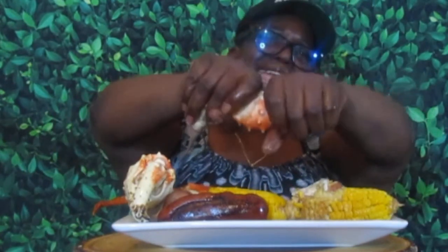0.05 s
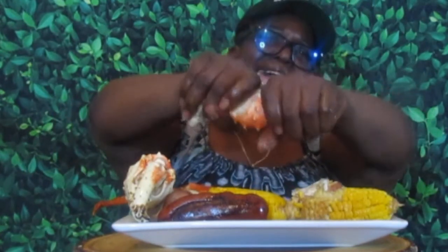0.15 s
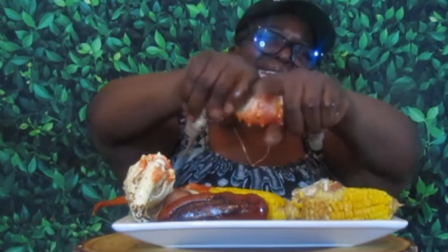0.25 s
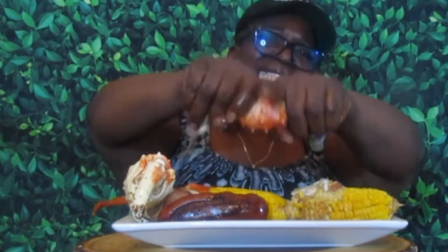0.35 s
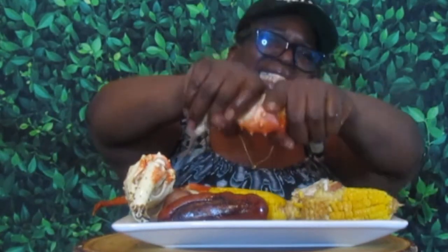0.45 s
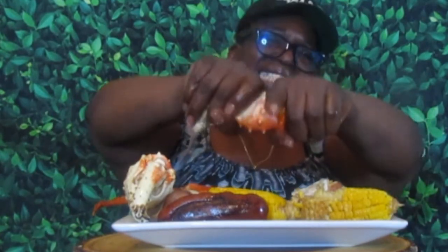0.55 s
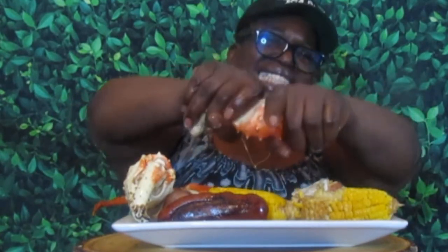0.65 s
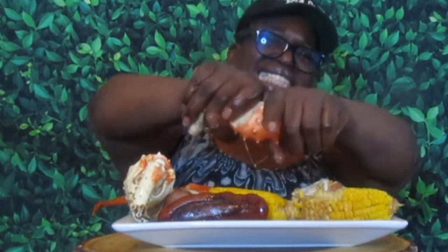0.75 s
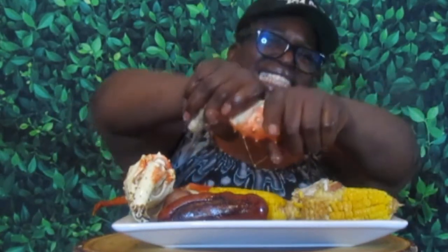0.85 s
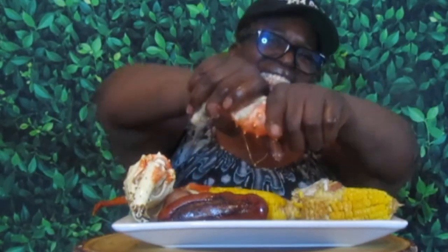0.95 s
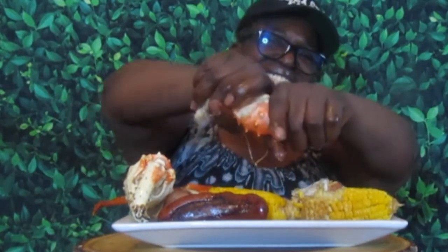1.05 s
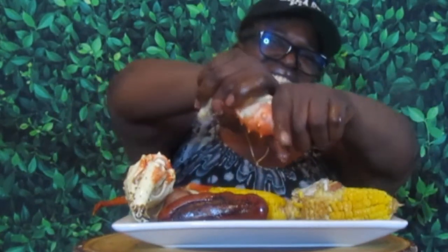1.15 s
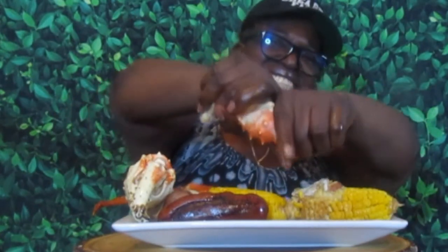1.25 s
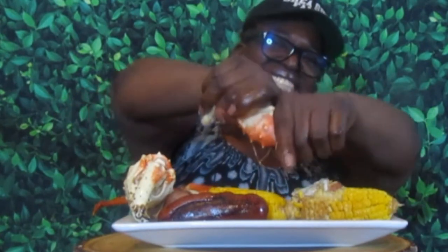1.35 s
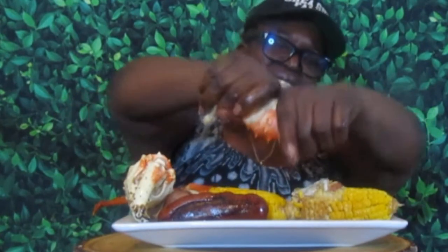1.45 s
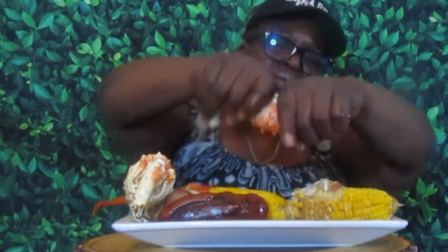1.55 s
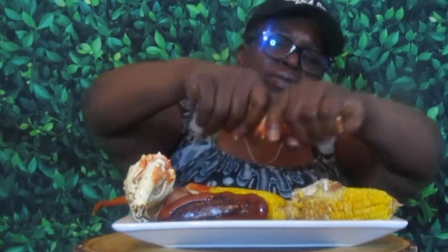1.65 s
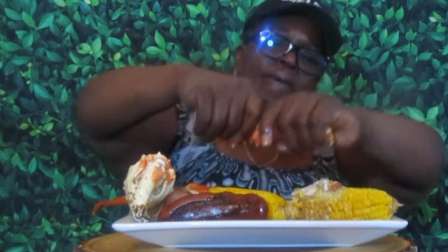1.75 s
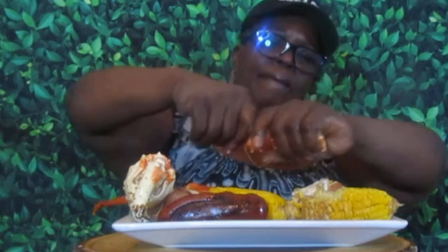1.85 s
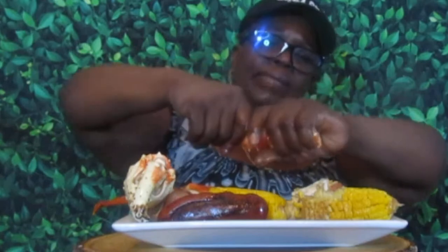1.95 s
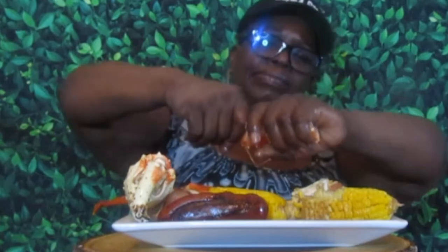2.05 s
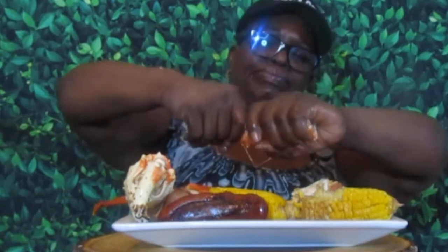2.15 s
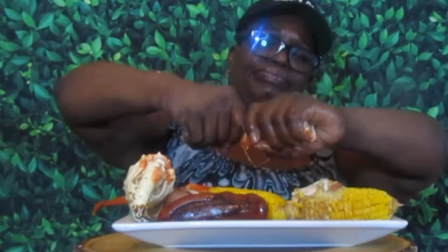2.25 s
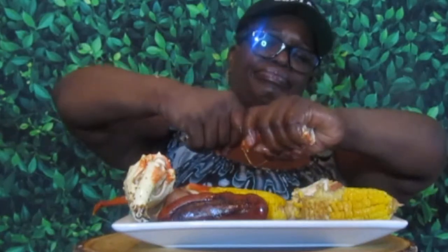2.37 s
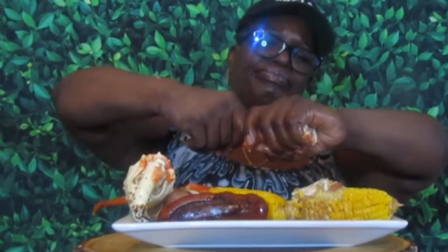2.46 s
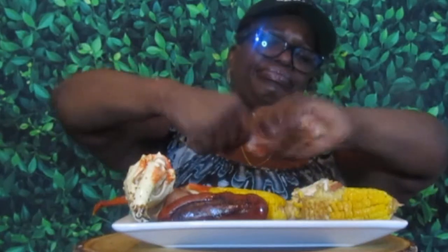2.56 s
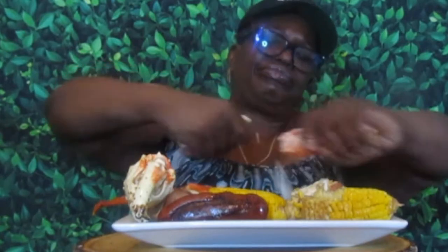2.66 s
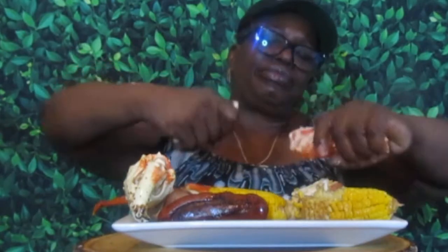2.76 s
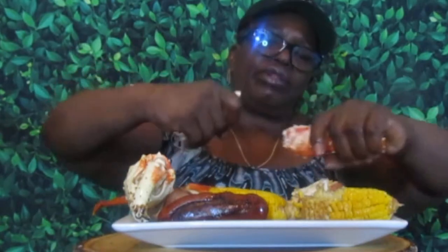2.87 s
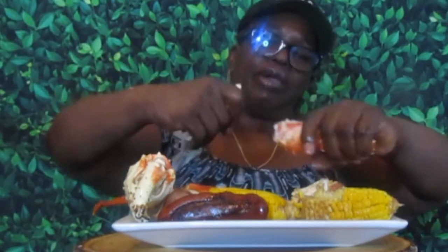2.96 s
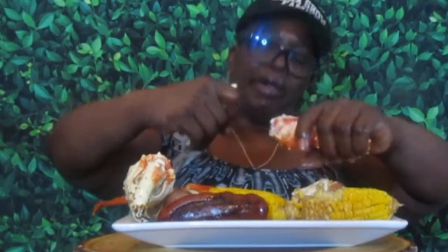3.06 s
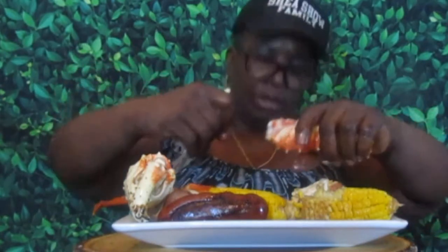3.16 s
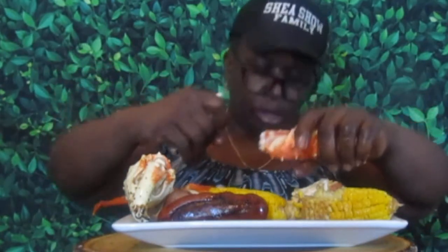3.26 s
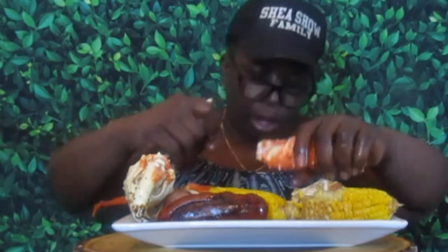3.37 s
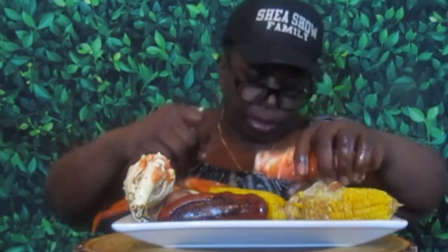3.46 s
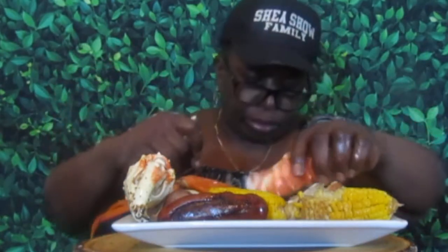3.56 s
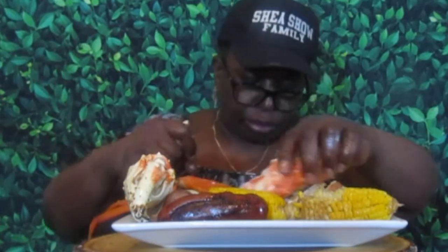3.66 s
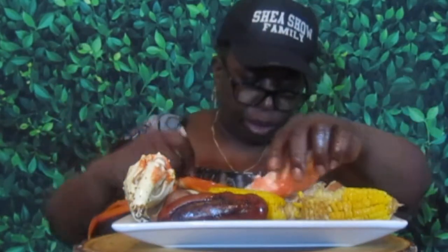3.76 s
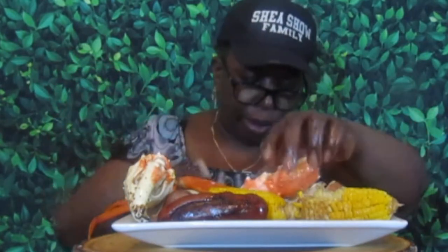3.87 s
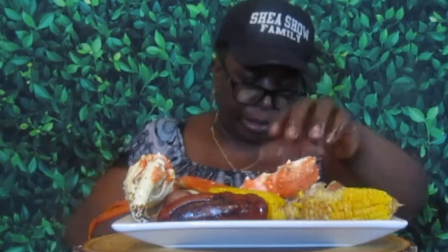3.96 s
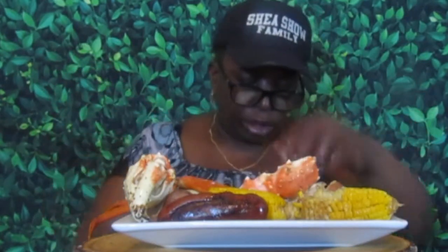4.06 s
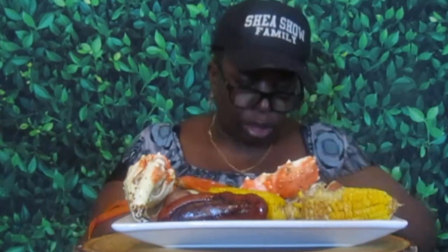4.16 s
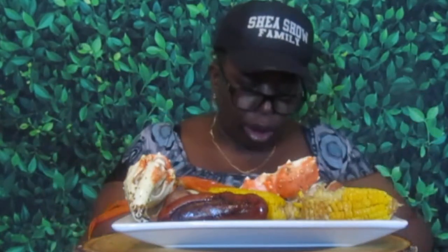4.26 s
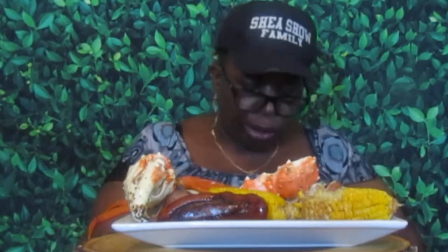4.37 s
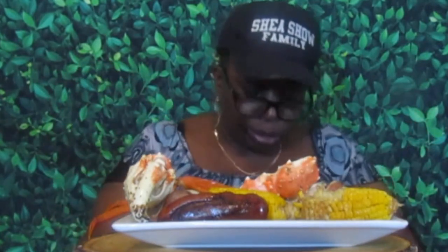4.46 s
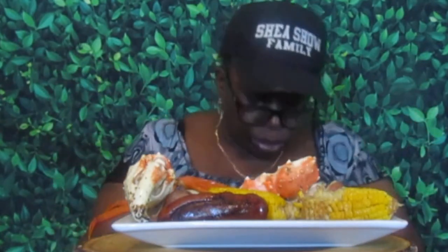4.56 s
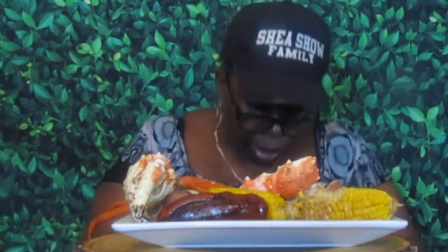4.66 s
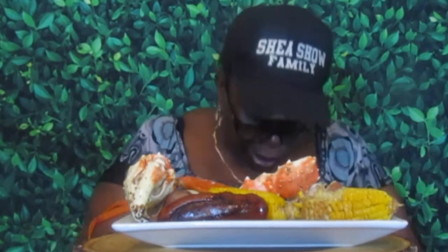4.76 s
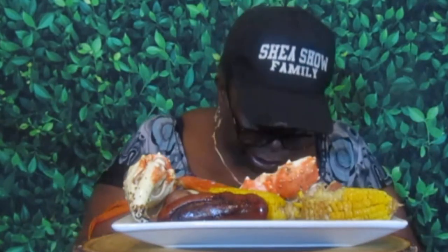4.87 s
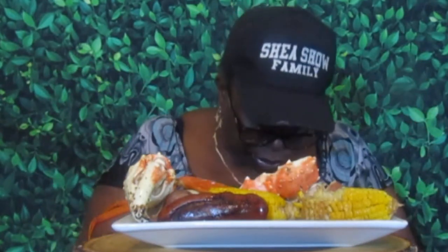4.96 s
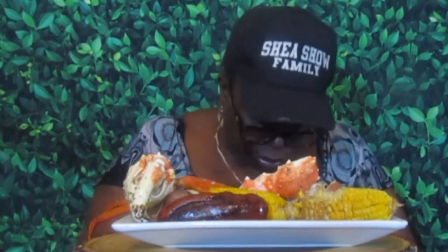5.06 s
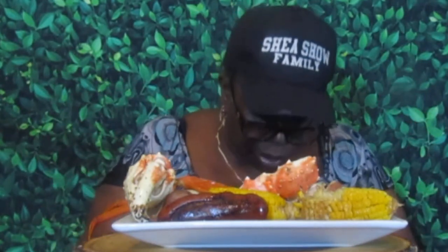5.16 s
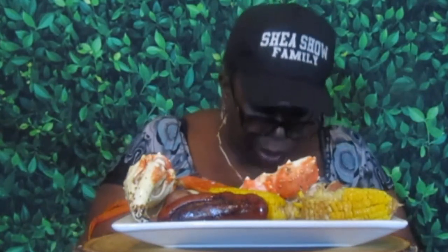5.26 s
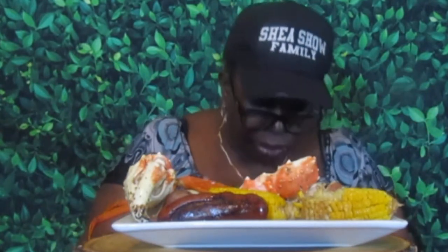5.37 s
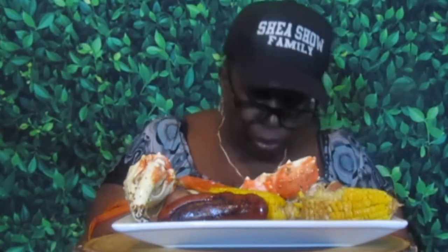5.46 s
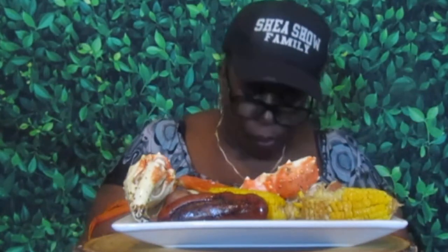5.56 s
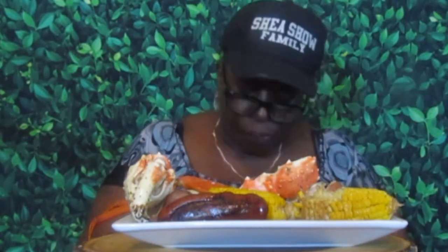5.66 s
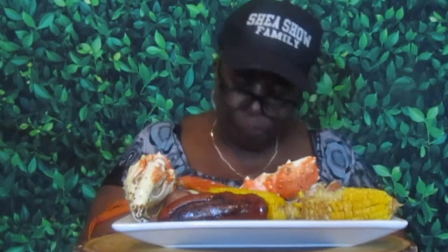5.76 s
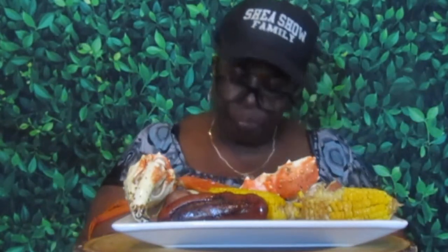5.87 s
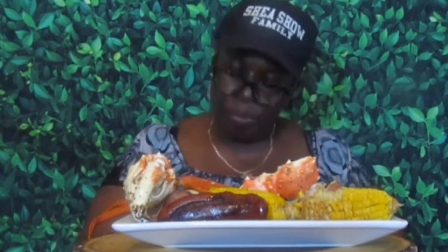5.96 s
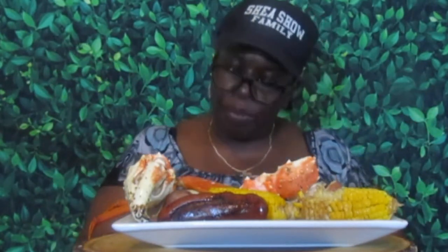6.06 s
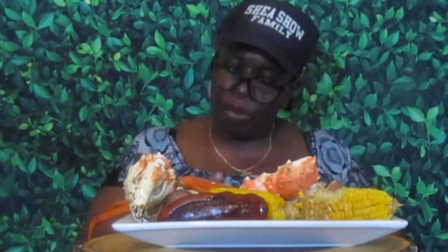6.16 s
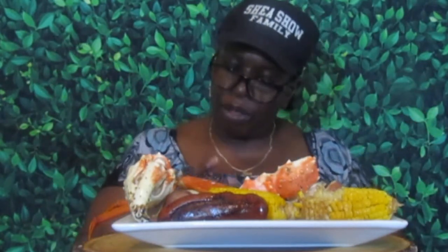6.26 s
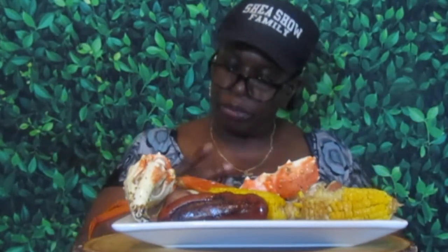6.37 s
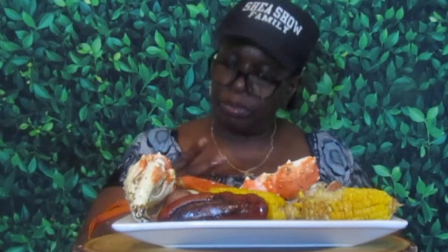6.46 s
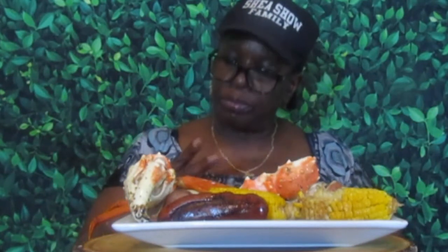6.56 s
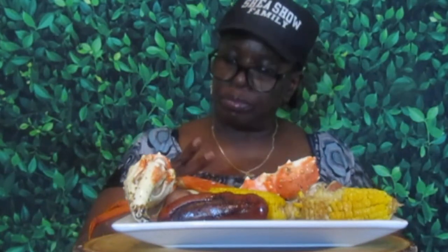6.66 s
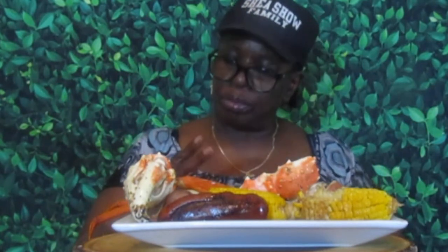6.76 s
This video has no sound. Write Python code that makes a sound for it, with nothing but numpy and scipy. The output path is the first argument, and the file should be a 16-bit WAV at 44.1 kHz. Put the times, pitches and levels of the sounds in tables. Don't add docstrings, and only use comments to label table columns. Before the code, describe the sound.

Close, dry recording at a table: faint paired motor ticks patter over soft room hiss while shell creaks under bending hands. Two seconds in, brittle snaps explode in clusters with short hollow rings and a quick room echo. The background drops, then creeps back. Pieces tap and clack onto a plate, hands rub softly, one low thump shakes the table, and a few small picking clicks end it, one brighter and hollow.

```python
import sys
import numpy as np
from scipy import signal
from scipy.fft import rfft, irfft
from scipy.io import wavfile

SR = 44100
rng = np.random.default_rng(int(sys.argv[2]) if len(sys.argv) > 2 else 0)


def put_to_file(sound):
    columns = np.atleast_2d(sound).T
    safe = np.clip(columns, -1, 1)
    whole_steps = np.round(safe * 32767)
    wavfile.write(sys.argv[1], SR, whole_steps.astype(np.int16))


def amplitude_ratio(level_db):
    exponent = np.asarray(level_db, float) / 20
    return 10 ** exponent


N = 300762


def band(x, hz, width_hz):
    return signal.lfilter(*signal.iirpeak(hz, hz / width_hz, fs=SR), x)


def ring(hz, t60, rise_s, phase, size):
    t = np.arange(size) / SR
    decay = np.exp(-np.log(1000) * t / t60)
    return np.sin(2 * np.pi * hz * t + phase) * (1 - np.exp(-t / rise_s)) * decay


def add(track, s, grain, db):
    i = int(s * SR)
    if i >= 0:
        scaled = grain * amplitude_ratio(db) / np.abs(grain).max()
        track[i:i + len(grain)] += scaled[:N - i]


def curve(rows):
    return np.interp(np.arange(N) / SR, *np.transpose(rows))


# (frequency [Hz], density [dB per Hz])
HISS_SPECTRUM = [(20, -6.5), (110, 1), (350, -1.5), (1150, -6.5), (2000, -13), (6800, -19.5), (10500, -23),
                 (14000, -31.5)]


def hiss():
    hz = np.fft.rfftfreq(N, 1 / SR)
    shape_hz, shape_db = np.transpose(HISS_SPECTRUM)
    shape = amplitude_ratio(np.interp(np.log(hz + 1), np.log(shape_hz), shape_db))
    air = irfft(rfft(rng.standard_normal(N)) * shape, N)
    whine = band(rng.standard_normal(N), 11800, 120)
    return air / air.std() * amplitude_ratio(-56.5) + whine / whine.std() * amplitude_ratio(-79)


# (delay [s], level [dB])
REFLECTIONS = [(.0105, -13), (.0135, -15), (.0195, -14), (.033, -17)]
# (band centre [Hz], t60 [s], level [dB])
REVERBERATION = [(200, .35, -28), (600, .3, -30), (1400, .35, -29.5), (3000, .32, -30), (6000, .31, -30),
                 (11000, .24, -28.5)]


def room(x):
    t = np.arange(SR // 2) / SR
    noise = rng.standard_normal((len(REVERBERATION), len(t)))
    tail = sum(amplitude_ratio(db - 60 * t / t60) * band(n, hz, hz) for (hz, t60, db), n in zip(REVERBERATION, noise))
    answer = tail * (1 - np.exp(-(t / 0.005) ** 2))
    answer[0] = 1
    for s, db in REFLECTIONS:
        answer[int(s * SR)] += amplitude_ratio(db)
    return signal.fftconvolve(x, answer)[:N]


# (frequency [Hz], level [dB], t60 [s])
LENS_MODES = [(2860, 6, 0.015), (3640, 4, 0.013), (4160, -7, 0.0093)]
LONG_STEPS = [0, 3, 4, 6, 14, 15, 19, 21, 23, 24, 26, 27, 28]


def focus_motor():
    start_s, step_s, steps = -0.0025, 0.06675, 33
    short_gap_ms, long_gap_ms = 8.6, 12.3
    start_tick_db, stop_tick_db, scatter_db = -45.5, -42.5, 1.85
    start_tilt_db = 3.5
    out = np.zeros(N)
    chance = rng.standard_normal((steps, 2, len(LENS_MODES), 2))
    force = rng.standard_normal((steps, 2))
    for k in range(steps):
        gap_ms = long_gap_ms if k in LONG_STEPS else short_gap_ms
        ticks_db = np.array([start_tick_db, stop_tick_db]) + scatter_db * force[k]
        for late_ms, tilt_db, db, draws in zip((0, gap_ms), (start_tilt_db, 0), ticks_db, chance[k]):
            tick = np.zeros(900)
            for m, ((hz, mode_db, t60), (a, b)) in enumerate(zip(LENS_MODES, draws)):
                level = amplitude_ratio(mode_db + m * tilt_db + 0.83 * a)
                tick += level * ring(hz * (1 + 0.026 * b), t60, 0.00027, 3 * b, size=900)
            add(out, start_s + k * step_s + late_ms / 1000, tick, db)
    return out


# (start [s], hold [s], level [dB], fade [dB per s])
STROKES = [
    (4.06, 0.18, -57, 250),
    (4.44, 0.27, -59.5, 35),
    (5.15, 0.32, -67.5, 120),
]


def rustle():
    rise_db_per_s = 300
    t = np.arange(N) / SR
    grains = rng.standard_normal(N) * amplitude_ratio(2.6 * rng.exponential(size=N))
    rub = band(grains, 3900, 1800) + 3.5 * band(grains, 960, 890)
    strokes = np.zeros(N)
    for s, hold_s, db, fade_db in STROKES:
        swell = rise_db_per_s * np.maximum(s - t, 0)
        fade = fade_db * np.maximum(t - s - hold_s, 0)
        strokes += amplitude_ratio(db - swell - fade)
    return rub / rub.std() * strokes


# (time [s], peak level [dB], frequency [Hz], t60 [s])
KNOCKS = [(1.902, -42, 560, 0.02), (2.148, -44, 430, 0.018), (2.35, -44, 433, 0.024),
          (2.463, -40.5, 530, 0.022), (2.499, -30.5, 449, 0.027), (2.51, -48, 700, .04),
          (3.678, -51, 250, 0.028), (3.717, -45.5, 392, 0.03), (4.165, -56, 810, 0.038),
          (5.125, -44, 510, 0.033), (6.11, -44.5, 670, 0.012)]


def knocks():
    out = np.zeros(N)
    for s, db, hz, t60 in KNOCKS:
        low = ring(hz, t60, 0.0015, 0, size=4000)
        overtone = ring(1.543 * hz, 1.17 * t60, 0.0057, 0, size=4000)
        add(out, s, low + 1.24 * overtone, db)
    return out


# (frequency [Hz], level [dB], t60 [s])
TABLE_MODES = [(62, -22, .5), (148.7, -4, 0.13), (202, -3.5, .14), (297, 5.5, 0.048), (358, 1, 0.052),
               (538, 7, 0.04), (638, -11.5, 0.063), (836, -2, 0.053), (1220, -3, 0.027)]


def thump():
    out = np.zeros(N)
    blow = -sum(amplitude_ratio(db) * ring(hz, t60, 0.0012, 0, size=16000) for hz, db, t60 in TABLE_MODES)
    add(out, 4.4728, blow, -24.5)
    return out


# (time [s], frequency [Hz], peak level [dB])
HOLLOW_RINGS = [(2.2652, 4250, -8), (2.2652, 3830, -16), (2.2652, 4860, -19), (2.5101, 1200, -22.5),
                (2.5101, 1110, -26.5), (2.8672, 10600, -46.5), (2.8722, 2850, -40.5), (2.8712, 3620, -34.5),
                (2.8712, 5970, -30.5), (2.8713, 4530, -37.5), (2.871, 10500, -45), (2.8765, 2200, -49),
                (3.692, 1320, -34), (3.6925, 4700, -38.5), (3.703, 1600, -27.5), (3.7168, 873, -33.5),
                (3.7172, 1300, -18.5), (3.7168, 3960, -21), (3.7173, 5260, -29.5), (5.136, 3560, -47.5),
                (5.348, 4100, -47), (6.173, 1940, -27.5), (6.1752, 1730, -40), (6.1754, 2400, -42),
                (6.1754, 2810, -23.5), (6.1754, 6240, -25.5)]


def hollow_pieces():
    out = np.zeros(N)
    for s, hz, db in HOLLOW_RINGS:
        add(out, s, ring(hz, 17 / hz, 0.00027, 0, size=2000), db)
    return out


# (frequency [Hz], width [Hz])
SNAP_BANDS = [(1300, 1100), (2450, 1700), (4200, 2400), (6350, 1000), (10700, 4600)]
CREAKS = [(.0065, -39.5, 4600, 17, -35), (.0653, -41, 4080, 5, 8.5), (.1382, -48, 3500, 2, -30),
          (.1669, -40.5, 2600, 7, -30), (.1992, -46, 4400, 11, -20), (.382, -49, 3200, 16, -28),
          (.4002, -47.5, 6000, 8, -2), (.531, -50, 6300, 14, -16), (.573, -44, 3000, 8, 5),
          (.5942, -40, 4400, 18, 6.5), (1.0796, -35, 3180, 24, -17), (1.2466, -62, 2800, 14, -5),
          (1.4234, -42.5, 4200, 3.5, -2), (1.605, -33, 3070, 9, -7), (1.7192, -36, 5370, 14, -4),
          (2.0119, -37.5, 3200, 10.5, -0.5), (2.112, -37.5, 5800, 9, 0)]
CRACKS = [(2.1473, -21, 5550, 5, -2.5), (2.2571, -58, 3000, 1, 21), (2.2603, -48, 6300, 6.5, 13.5),
          (2.2654, -6, 4180, 29, -12.5), (2.2675, -10.5, 4100, 12.5, -37.5),
          (2.287, -12.5, 4200, 47.5, -39.5), (2.3256, -18, 4200, 29.5, -2), (2.35, -14.5, 5540, 7.5, -2.5),
          (2.3585, -20, 4500, 14.5, 2), (2.4627, -14.5, 4600, 5, -1), (2.475, -23, 2530, 21, 5.5),
          (2.4844, -9.5, 4970, 7.5, -19), (2.5009, -5, 4800, 18, 1), (2.5027, -5.5, 6340, 20, -20),
          (2.5107, -4, 2600, 10, -20.5), (2.5132, -6.5, 4570, 18.5, -11), (2.5206, -19.5, 5030, 4, 5.5),
          (2.8575, -43, 4600, 26, -14), (2.868, -45.5, 6300, 14.5, -8), (2.8712, -31, 4900, 29, -26),
          (2.876, -23.5, 3200, 34, -40)]
# (time [s], peak level [dB], pitch of the
# piece [Hz], fall away from it [dB per octave], fizz [dB])
HANDLING = [(3.115, -51, 6300, 2, -13), (3.2536, -45, 4220, 28.5, -27), (3.2674, -46, 4497, 22, -20),
            (3.3134, -45, 4200, 24.5, 0.5), (3.339, -50, 6300, 20, -0.5), (3.5623, -42, 2800, 11, -12),
            (3.6768, -37, 5100, 21, 0), (3.6936, -29, 1300, 10, -24), (3.702, -47, 1300, 12, -26),
            (3.7168, -16, 3070, 10, -11.5), (4.037, -37, 4500, 25, -32), (4.3408, -40, 4500, 27, -34),
            (4.405, -57, 4200, 3, 12), (4.4744, -33, 1300, 3, -40),
            (4.8766, -46, 5100, 18, -22), (5.1269, -33.5, 3800, 32, -12), (5.1612, -42, 3200, 22, -36),
         (5.231, -39.5, 3200, 22, -20), (5.29, -50, 6000, 11, -18), (5.348, -41, 4200, 20, -4),
         (5.4663, -45.5, 4600, 24, -35), (5.9261, -37.5, 3100, 18, -23), (6.148, -24.5, 4760, 43, -27),
         (6.174, -35, 5900, 0, -11), (6.1743, -36.5, 6300, -1, 5.5), (6.74, -48, 4900, 10, -21)]


def snaps():
    tear_db, tear_s = -17.5, 0.0025
    out = np.zeros(N)
    t = np.arange(1200) / SR
    for s, db, piece_hz, fall_db, fizz_db in CREAKS + CRACKS + HANDLING:
        slips = amplitude_ratio(tear_db) * rng.standard_normal(len(t)) * np.exp(-t / tear_s)
        slips[0] = 1
        kicks_db = [-fall_db * abs(np.log2(hz / piece_hz)) for hz, _ in SNAP_BANDS[:-1]]
        kicks_db.append(fizz_db)
        for k, ((hz, width_hz), kick_db) in enumerate(zip(SNAP_BANDS, kicks_db)):
            grain = band(band(slips, hz, width_hz), hz, 1.21 * width_hz)
            add(out, s, (-1) ** k * grain, db + kick_db - 2.5)
    return out


# (time [s], level [dB])
GAIN = [
    (2.503, 0),
    (2.515, -9),
    (2.6, -10.5),
    (2.84, -10.5),
    (2.98, -4.5),
    (3.45, -3.5),
    (3.85, 0),
]


def gain_control():
    return amplitude_ratio(curve(GAIN))


def scene():
    table = (snaps() + hollow_pieces() + knocks() + thump()) / gain_control()
    return (hiss() + focus_motor() + rustle() + room(table))[None]


def low_pass(x):
    return signal.sosfilt(signal.butter(12, 16320, fs=SR, output="sos"), x)


def record(dry):
    ceiling = 0.85
    x = dry - 0.72 * band(dry, 7850, 500)
    x = ceiling * np.tanh(x * gain_control() / ceiling)
    x = signal.sosfilt(signal.ellip(6, 0.5, 38, 15100, fs=SR, output="sos"), x)
    return low_pass(x)


dry = scene()
out = record(dry)
put_to_file(out)
```